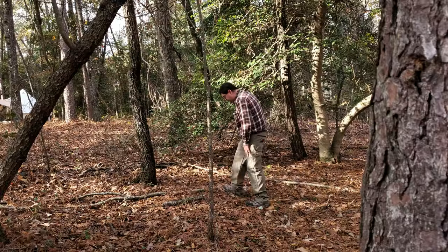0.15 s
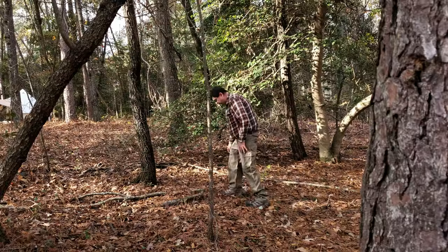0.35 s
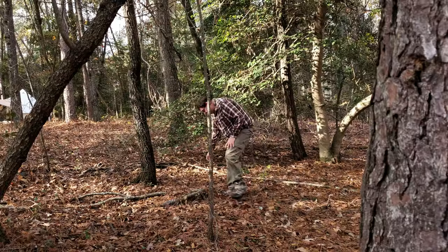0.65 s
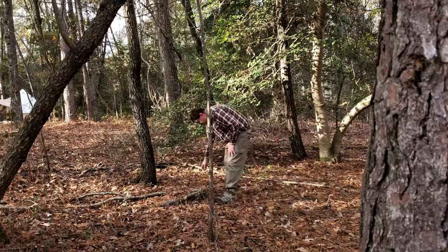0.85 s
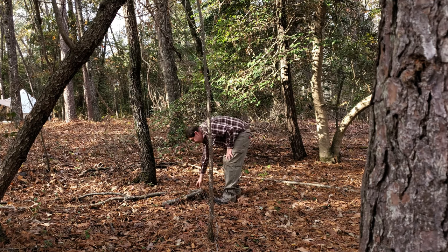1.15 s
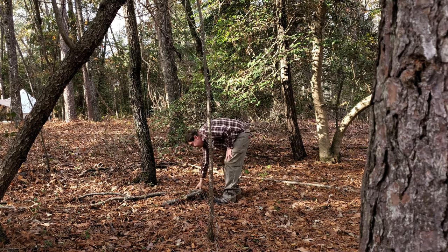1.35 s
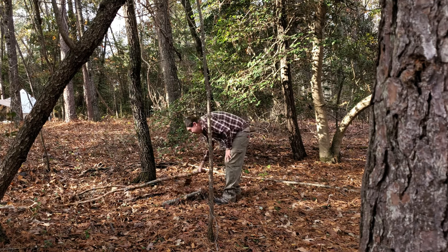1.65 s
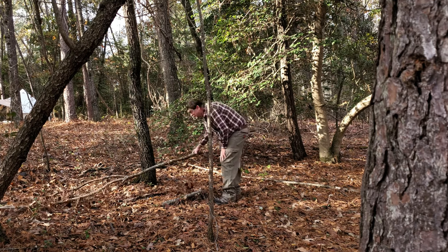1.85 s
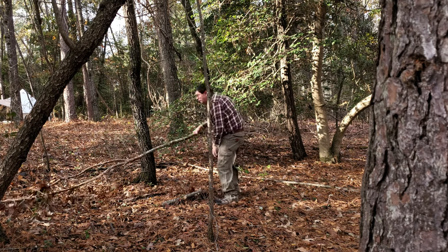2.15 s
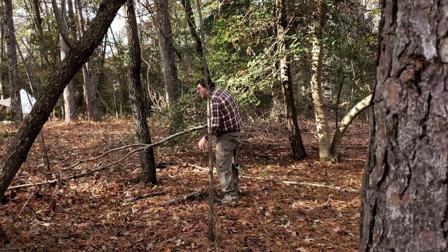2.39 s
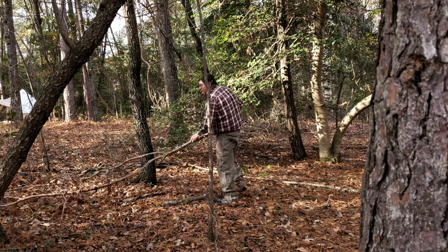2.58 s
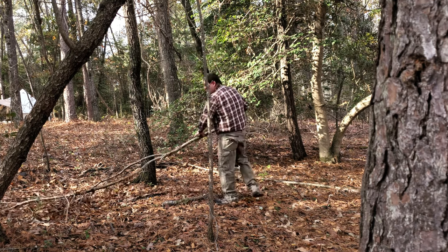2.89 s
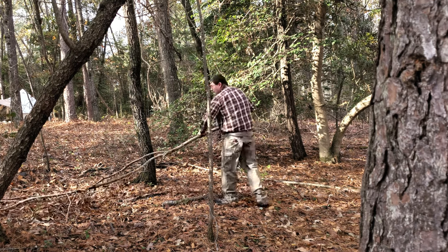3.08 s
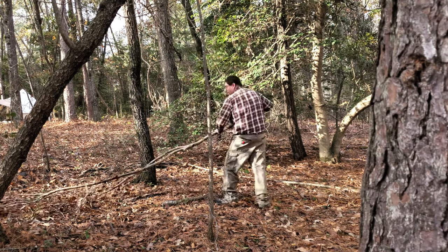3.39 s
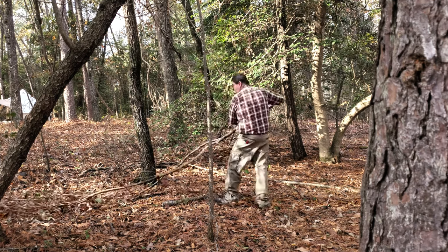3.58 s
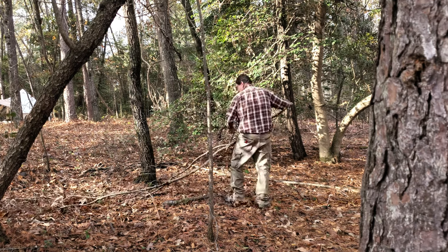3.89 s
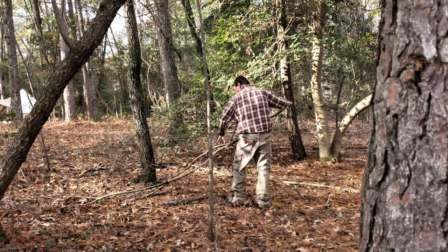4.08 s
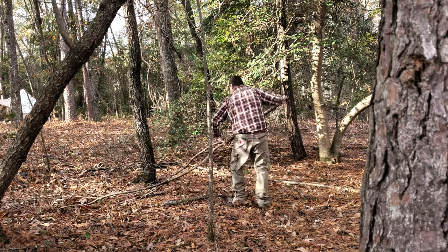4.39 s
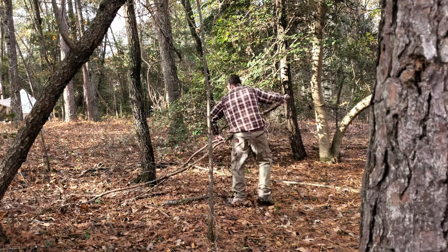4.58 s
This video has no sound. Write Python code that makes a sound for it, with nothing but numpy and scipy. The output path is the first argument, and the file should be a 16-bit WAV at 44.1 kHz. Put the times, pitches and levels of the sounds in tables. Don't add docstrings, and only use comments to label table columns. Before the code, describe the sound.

Crisp footsteps in leaf litter, a sharp twig snap, then two swelling crunchy pulls of a branch through dry leaves, over a faint far engine drone.

```python
import sys
import numpy as np
from scipy import signal
from scipy.fft import rfft, irfft
from scipy.io import wavfile
from scipy.ndimage import uniform_filter1d, map_coordinates

SR = 44100
rng = np.random.default_rng(int(sys.argv[2]) if len(sys.argv) > 2 else 0)


def store_pcm(level_fs):
    pcm = np.round(np.clip(level_fs, -1, 1) * 32767).astype(np.int16)
    wavfile.write(sys.argv[1], SR, np.atleast_2d(pcm).T)


def voltage_ratio(decibels):
    exponent = np.asarray(decibels, float) / 20
    return 10 ** exponent


N = 209034
T = np.arange(N) / SR


def evened(x):
    return x / np.sqrt(np.mean(x ** 2) + 1e-20)


def read(points, hz):
    f, value = np.transpose(points)
    return np.interp(np.log(hz + 1), np.log(f + 1), value)


def curves(rows, t):
    s, *columns = np.transpose(rows)
    return [np.interp(t, s, c) for c in columns]


def band(x, lo_hz, hi_hz):
    return signal.sosfilt(signal.butter(2, [lo_hz, min(hi_hz, SR / 2.1)], "band", fs=SR, output="sos"), x)


def resonate(x, hz, width_hz):
    turn = np.exp(2j * np.pi * np.cumsum(hz) / SR)
    r = np.exp(-np.pi * width_hz / SR)
    return 2 * (turn * signal.lfilter([1 - r], [1, -r], x / turn)).real


# (time [s], lead of the left port [ms], share heard directly [0-1])
BEARING = [(0, 0.038, 0.05), (1.0, .0, 0), (1.8, 0.13, 0), (2.1, 0.24, 0.2), (2.65, 0.26, 0.15),
           (2.8, 0.15, 0.03), (3.4, 0.28, 0.34), (3.9, 0.067, 0), (4.74, 0.027, 0.13)]


def two_ports(x):
    lead_ms = curves(BEARING, T)[0]
    delayed = map_coordinates(x, [np.arange(N) - lead_ms * SR / 1000], order=3)
    return np.array([x, voltage_ratio(-2.0 - 5.0 * lead_ms) * delayed])


# (frequency [Hz], time to fall 60 dB [s])
TRUNK_DECAY = [(300, 0.13), (2000, 0.17), (8000, 0.61), (16000, 0.052)]


def trunks(x):
    taps = np.zeros((2, SR // 2))
    at = np.arange(160, SR // 2 - 20, 20) + rng.integers(0, 20, (2, (SR // 2 - 161) // 20))
    np.put_along_axis(taps, at, rng.choice([-1., 1.], at.shape), 1)
    hz, t, z = signal.stft(taps, SR, nperseg=128)
    tail = signal.istft(z * voltage_ratio(-60 * t / read(TRUNK_DECAY, hz)[:, None]), SR, nperseg=128)[1]
    return signal.fftconvolve(x[None], tail / np.linalg.norm(tail[0]), axes=1)[:, :N]


def crackle(per_s, spread_db, count=22):
    drift = evened(uniform_filter1d(rng.standard_normal(600), 3))
    clumps = np.interp(T, np.arange(600) * T[-1] / 599, drift)
    rank = np.minimum(rng.exponential(1, N), 6)
    breaks = voltage_ratio(1.23 * clumps) * (rng.random(N) < per_s / SR)
    kind = rng.integers(0, count, N)
    t, out = np.arange(500) / SR, np.zeros(N)
    for k, hz in enumerate(300 + 15400 * np.linspace(0, 1, count) ** 1.701):
        cycles = 1.5 + hz / 2200
        ring = np.exp(-t * hz / cycles) * np.sin(2 * np.pi * (hz * t + rng.random()))
        whole = 1.7 + 0.47 * np.exp(-np.log(hz / 4300) ** 2 / 0.099)
        train = voltage_ratio(spread_db * whole * rank) * breaks * (kind == k)
        out += evened(signal.oaconvolve(train, ring)[:N])
    return evened(out)


# (time of peak [s], crackle level [dB], rise [s], fall [s], weight on the ground below 2 kHz [dB])
STIRS = [(.146, -58, 0.0081, .15, -4), (.2, -50, 0.081, 0.23, -6), (.385, -52.5, 0.066, 0.28, -5.5),
         (.522, -49.5, .011, 0.15, -7), (.7, -51, 0.28, 0.28, -7), (.79, -47, 0.11, .2, -7.5),
         (0.869, -52.5, 0.23, 0.1, 1), (1.0, -66, 0.14, 0.44, -4), (1.3, -67, .3, 0.9, 0.5),
         (1.54, -56, .15, 0.42, -10.5), (1.7, -60, 0.26, 0.47, -6), (1.98, -53.5, 0.24, 0.24, -4),
         (2.14, -53, 0.089, 0.13, 0), (2.36, -41, 0.36, 0.35, -8.5), (2.46, -41, 0.2, 0.34, -9.5),
         (2.62, -50, 0.31, 0.27, -1), (2.78, -43, 0.43, 0.27, -7), (3.08, -57, 0.54, 0.65, -5.5),
         (3.36, -46.5, 0.31, 0.59, -7.5), (3.6, -39.5, 0.39, 0.28, -6), (3.72, -42.5, 0.6, .18, -8),
         (3.88, -50.5, 0.14, 0.22, -9.5), (3.945, -47.5, 0.021, 0.24, -7), (4.22, -58.5, 0.16, 0.72, -7.5),
         (4.67, -58.5, 0.22, 0.21, -7.5)]
REST_DB, REST_WEIGHT_DB = -73.5, 3


def stirring(t):
    s, db, rise, fall, weight_db = np.transpose(STIRS)[:, :, None]
    away = np.where(t < s, (s - t) / rise, (t - s) / fall)
    power = voltage_ratio(db - 21.5 * away ** 1.505) ** 2
    rest = voltage_ratio(REST_DB) ** 2
    total = power.sum(0) + rest
    return 10 * np.log10(total), ((power * weight_db).sum(0) + rest * REST_WEIGHT_DB) / total


# (frequency [Hz], level per Hz [dB])
LEAF_COLOUR = [(150, -8.5), (300, -7), (600, -5), (1100, -7), (1600, -4), (2200, -7.5), (3000, 0.5),
               (4000, -0.5), (5500, -1.5), (7200, -1.5), (9000, -5), (11000, -4), (13500, -5),
               (15500, -4.5)]
USUAL_WEIGHT_DB, USUAL_BRIGHT_DB = -7, -1.5
HARD_DB, BRIGHT_DB, BRIGHT_PER_DB = -32.5, 1.4, 0.22
# (time [s], pitch [Hz])
HEAP_PITCH = [(0, 4600), (1.5, 3860), (2.5, 4100), (3.35, 4030), (3.6, 4520), (4.0, 3930), (4.74, 3800)]
HEAP_DB, HEAP_PER_DB, HEAP_WIDTH_HZ = 5, .35, 550


def litter():
    direct = np.clip(curves(BEARING, T)[1], 0, 1)
    spot = two_ports(crackle(4000, spread_db=-0.5))
    spread = np.array([*two_ports(crackle(12000, spread_db=0.5)), crackle(12000, spread_db=0.5)])
    layers = [*(np.sqrt(direct) * spot), *(np.sqrt(1 - direct) * spread)]
    hz, t, z = signal.stft(layers, SR, nperseg=256)
    same = 1 / (1 + (hz / 1700) ** 2)[:, None]
    z = z[:2] + np.array([z[2], same * z[3] + np.sqrt(1 - same ** 2) * z[4]])
    z *= voltage_ratio(read(LEAF_COLOUR, hz))[:, None] / np.sqrt(np.mean(abs(z) ** 2, axis=(0, 2), keepdims=True))
    unit = np.sqrt(np.mean(band(signal.istft(z, SR, nperseg=256)[1], 1870, 7850) ** 2))

    level_db, weight_db = stirring(t)
    hardness_db = level_db - HARD_DB
    bright_db = BRIGHT_DB + BRIGHT_PER_DB * hardness_db
    low = 1 / (1 + (hz / 2100) ** 4)[:, None]
    high = 1 / (1 + (7600 / (hz + 1)) ** 6)[:, None]
    colour_db = low * (weight_db - USUAL_WEIGHT_DB) + high * (bright_db - USUAL_BRIGHT_DB)
    heap_hz = curves(HEAP_PITCH, t)[0]
    heap_db = np.maximum(HEAP_DB + HEAP_PER_DB * hardness_db, 0)
    colour_db = colour_db + heap_db * np.exp(-((hz[:, None] - heap_hz) / HEAP_WIDTH_HZ) ** 2)
    stirred = signal.istft(z * voltage_ratio(colour_db + level_db), SR, nperseg=256)[1][:, :N]
    return voltage_ratio(-0.83) * stirred / unit


# (time [s], peak level [dB], pitch [Hz])
POPS = [(2.1867, -37, 4820), (2.2421, -36, 3970), (2.3219, -36, 3930), (2.3394, -29, 3470),
        (2.3609, -33, 3800), (2.531, -33, 3480), (2.5903, -28, 4250), (2.624, -36, 3200),
        (2.6772, -31, 3200), (2.7285, -34, 3700), (2.745, -42, 3430), (2.7754, -44, 5440),
        (2.7754, -33, 5450), (2.9899, -49, 3520), (3.2708, -42, 4640), (3.3441, -51, 6560),
        (3.3656, -32, 6260), (3.403, -31, 4580), (3.4224, -39, 3500), (3.4637, -34, 3980),
        (3.5541, -34, 4770), (3.5786, -35, 4800), (3.617, -27.5, 4770), (3.6749, -26, 3560),
        (3.7746, -49, 3100)]


def pops():
    t, out = np.arange(300) / SR, np.zeros(N + 300)
    for s, db, hz in POPS:
        swell = t / 0.00093 * np.exp(1 - t / 0.001)
        out[round(s * SR):][:len(t)] += voltage_ratio(db) * swell * np.sin(2 * np.pi * hz * t)
    return voltage_ratio(-5.5) * two_ports(out[:N])


# (time [s], peak level [dB], centre [Hz], crack length [ms])
SNAPS = [(.141, -29, 6200, 0.94), (0.178, -39.5, 2800, 2.5), (.25, -46, 3000, 1.5),
         (0.3679, -26, 6000, 1.4), (.4251, -37, 3530, 1.6), (0.465, -23.5, 6000, 2.1),
         (0.5129, -17.5, 4560, 2.2), (0.513, -31, 2450, 3.3), (0.7805, -28.5, 5300, 3.6),
         (.879, -33, 11600, 3.1), (1.325, -37.5, 4800, 0.48), (2.028, -39, 5040, 2.4),
         (2.133, -23, 9800, 0.8), (2.361, -20.5, 4500, 1.1), (2.7761, -16.5, 10500, 0.51),
         (2.777, -24, 5500, 1.4), (2.78, -33, 10000, 6.5), (3.346, -23, 11000, 0.73),
         (3.424, -25, 3800, 0.92), (3.4657, -22.5, 4080, 1.1), (3.9376, -23.5, 7000, 1),
         (3.956, -34, 5500, 4.6), (4.028, -43, 3470, 3), (4.187, -42, 4050, 1.7), (4.66, -36, 6260, 1.3)]
# (time [s], peak level [dB], centre [Hz])
TICKS = [(1.5194, -44, 4310), (1.9494, -45, 4850), (2.7094, -36, 6500), (2.9896, -43, 9000),
         (3.0759, -40, 11000), (3.3994, -31, 5000), (4.134, -41, 11000), (4.1994, -41, 5000),
         (4.247, -45, 11000), (4.2994, -45, 7000), (4.4164, -39, 5500), (4.4897, -44, 12000)]
TICK_MS = .6


def cracks():
    t, ports = np.arange(1500) / SR, np.zeros((2, N + 1500))
    for s, db, hz, ms in [*SNAPS, *[(s, db, hz, TICK_MS) for s, db, hz in TICKS]]:
        fibres = rng.standard_normal((3, len(t)))
        shape = (1 - np.exp(-t / .0001)) * np.exp(-(t * 1000 / ms) ** 1.4)
        rebound = 0.094 * np.exp(-abs(t - .0047) / 0.00077)
        shape = shape + rebound + 0.086 * np.exp(-t / 0.01)
        for out, own in zip(ports, fibres[1:]):
            tear = (fibres[0] + 0.88 * own) * shape
            tear = tear + 2.5 * (t == t[4])
            crack = band(tear, max(hz / 2.2, 1500), 17000) + 1.2 * band(tear, hz / 1.7, hz * 1.4)
            out[round(s * SR):][:len(t)] += voltage_ratio(db) * crack / abs(crack).max()
    return ports[:, :N]


# (time [s], peak level [dB], pitch [Hz])
KNOCKS = [(.141, -50, 3660), (.177, -45, 298), (.25, -46, 278), (.368, -45.5, 260), (.3681, -36, 1430),
          (.3684, -40, 685), (.4251, -42.5, 1270), (.466, -32.5, 1900), (.4662, -39.5, 510),
          (.5132, -33.5, 330), (.5135, -36, 1950), (.5143, -30.5, 610), (.5146, -49, 860),
          (0.5135, -19, 4330), (0.5143, -31, 5900), (0.5139, -30, 1620), (.7795, -44, 286),
          (.879, -42, 2050), (2.028, -31, 2860), (2.133, -50, 5130), (2.7761, -29, 1660),
          (2.7774, -50, 1190), (2.78, -27, 1650), (3.935, -41, 1400), (3.9376, -30, 5550),
          (3.955, -48, 1470), (4.66, -42.5, 1970)]


def knocks():
    t, wood = np.arange(1500) / SR, np.zeros(N + 1500)
    for s, db, hz in KNOCKS:
        knock = np.sin(2 * np.pi * hz * t) * (1 - np.exp(-t * hz * 3)) * np.exp(-t * hz / 0.84 - t / 0.0059)
        wood[round(s * SR):][:len(t)] += voltage_ratio(db) * knock / abs(knock).max()
    return wood[:N]


def snaps():
    left, right = cracks() + knocks()
    direct = np.array([left, two_ports(right)[1]])
    return voltage_ratio(-0.5) * direct + voltage_ratio(-8.0) * trunks(direct.mean(0))


# (start [s], length [s], top of the strongest partial [Hz], level [dB], rasp [0-1])
CAWS = [
    (.262, .09, 1595, -57.5, .05),
    (.645, .112, 1595, -53.5, .03),
    (1.19, .1, 1525, -58.5, .27),
    (1.845, .09, 1515, -59, .3),
]
CAW_BEND, CAW_TOP_AT, CAW_EDGE_DB = .19, .38, -9
THROAT_HZ, THROAT_WIDTH_HZ, THROAT_DB = 1400, 82, 6


def crow():
    voice = np.zeros(N)
    for start, length, top_hz, db, rasp in CAWS:
        u = np.linspace(0, 1, round(length * SR))
        off = np.where(u < CAW_TOP_AT, 1 - u / CAW_TOP_AT, (u - CAW_TOP_AT) / (1 - CAW_TOP_AT))
        hz = top_hz * (1 - CAW_BEND * (1 - rasp) * off ** 2)
        shake = (.04 + .4 * rasp) * uniform_filter1d(rng.standard_normal(len(u)), 150)
        turns = np.cumsum(hz * (1 + shake)) / SR
        beat = 1 + 2 * rasp * np.cos(2 * np.pi * turns / 9.84)
        caw = evened(beat * np.sin(2 * np.pi * turns)) * voltage_ratio(db + CAW_EDGE_DB * (2 * u - 1) ** 6)
        caw = caw * voltage_ratio(THROAT_DB * (np.exp(-((hz - THROAT_HZ) / THROAT_WIDTH_HZ) ** 2) - 1.0))
        voice[round(start * SR):][:len(u)] = caw * signal.windows.tukey(len(u), .15)
    late = np.array([voice, np.roll(voice, 9)])
    return late + voltage_ratio(-11) * trunks(voice)


# (time [s], firing rate [Hz])
ENGINE_RATE = [(0, 21.3), (2.3, 21.4), (3.5, 21.6), (4.74, 22.0)]
# (multiple of the firing rate [1], level idling [dB], gain at full load [dB])
ENGINE_ORDERS = [(3.2, -57.5, -5.5), (4, -61.5, 13), (5, -56, 5.5), (6, -76, 14), (7, -71, 11),
                 (8, -82, 21)]
# (time [s], load [0-1])
LOAD = [(0, 0.2), (.6, 0.55), (1.3, 0), (2.0, .4), (2.75, 0.9), (3.05, 0.63), (3.6, 0.79), (4.15, 0.46),
        (4.74, 0.16)]
# (time [s], pitch [Hz], level [dB])
SECOND_MOTOR = [(0, 114.9, -52.5), (1, 113, -49), (2.5, 118.4, -65.5), (3.5, 116.1, -66),
                (4.74, 115.7, -60)]


def engine():
    rate, load = curves(ENGINE_RATE, T)[0], curves(LOAD, T)[0]
    tones = [(k * rate, db + gain_db * load) for k, db, gain_db in ENGINE_ORDERS]
    out = np.zeros(N)
    for hz, db in tones + [curves(SECOND_MOTOR, T)]:
        steady = np.sqrt(2) * np.sin(2 * np.pi * (np.cumsum(hz) / SR + rng.random()))
        flutter = evened(resonate(resonate(rng.standard_normal(N), hz, 11.0), hz, 9.3))
        out += voltage_ratio(db) * (0.67 * steady + 0.5 * flutter)
    return out


# (frequency [Hz], level per Hz [dB])
AIR_COLOUR = [(20, -40), (32, -22), (50, -17.5), (70, 0.5), (110, -13), (140, -25), (200, -20),
              (310, -22.5), (480, -24.5), (800, -26.5), (1100, -47), (2200, -50), (3700, -35.5),
              (9000, -56.5)]
# (frequency [Hz], likeness [0-1])
AIR_SAME = [(60, 0.93), (180, 0.87), (550, 0.23), (1650, 0.046), (4970, 0.036), (15000, 0.03)]
AIR_DB = -67
GUST_MEAN_DB, GUST_LOAD_DB, GUST_SWING_DB = -2.5, 7.5, 2.5


def air():
    frames, hz = N // 512 + 5, np.fft.rfftfreq(2048, 1 / SR)
    a, b, c, d, patches = rng.standard_normal((frames, 1025, 5)).T
    patches = evened(uniform_filter1d(uniform_filter1d(patches, 20, 0), 8, 1))
    same = np.clip(read(AIR_SAME, hz), -1, 1)[:, None]
    left = a + 1j * b
    z = np.array([left, same * left + np.sqrt(1 - same ** 2) * (c + 1j * d)])
    waver = evened(uniform_filter1d(rng.standard_normal(frames), size=8))
    load = curves(LOAD, np.arange(frames) * 512 / SR)[0]
    gust_db = GUST_MEAN_DB + GUST_LOAD_DB * load + GUST_SWING_DB * waver
    bass = 1 / (1 + (hz / 200) ** 4)[:, None]
    colour_db = read(AIR_COLOUR, hz)[:, None] + 0.81 * patches + bass * gust_db
    x = signal.istft(z * voltage_ratio(colour_db), nperseg=2048, noverlap=1536)[1][:, :N]
    return voltage_ratio(AIR_DB) * x / np.sqrt(np.mean(band(band(x, 316, 16000), 316, 16000) ** 2))


def scene():
    return litter() + pops() + snaps() + crow() + engine() + air()


def band_limit(x):
    return signal.sosfilt(signal.butter(12, 16980, fs=SR, output="sos"), x)


# (frequency [Hz], width [Hz], level [dB])
CASING = [(2120, 770, 2), (7150, 690, -5)]
# (frequency [Hz], left over right [dB])
PORTS = [(60, -2), (92, 0.5), (140, 1.5), (210, -0.5), (330, -1), (500, 0), (770, 0), (1170, 2), (1790, 2),
         (2740, 3.5), (4190, -1), (6410, -3), (9810, 9), (15000, 1)]
WIDE_AT = [.141, .368, .466, .514, 2.133, 2.777]
EDGE_HZ, TOP_HZ = 15720, 16900


def record(dry):
    hz = np.fft.rfftfreq(N, 1 / SR)
    dips_db = sum(db * np.exp(-((hz - f) / width) ** 2) for f, width, db in CASING)
    ports_db = np.outer([.5, -.5], read(PORTS, hz))
    wide = irfft(rfft(dry) * voltage_ratio(dips_db + ports_db) * (hz < TOP_HZ), N)
    edge = signal.firwin(401, EDGE_HZ, window=("kaiser", 9), fs=SR)
    cut = signal.oaconvolve(wide, edge[None], "same")
    opened = sum(np.exp(-((T - s) / .0018) ** 2) for s in WIDE_AT)
    return band_limit(cut + opened * (wide - cut))


dry = scene()
out = record(dry)
store_pcm(out)
```